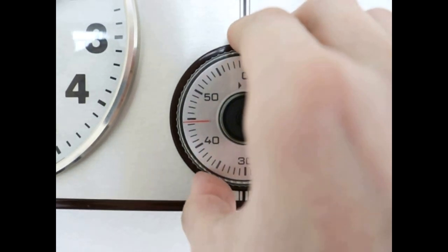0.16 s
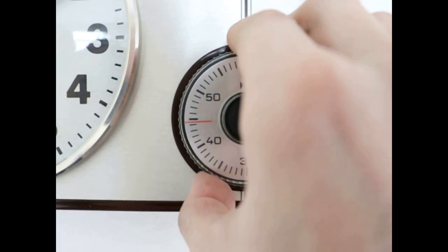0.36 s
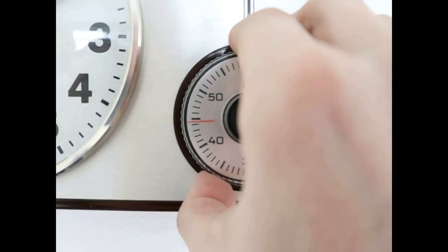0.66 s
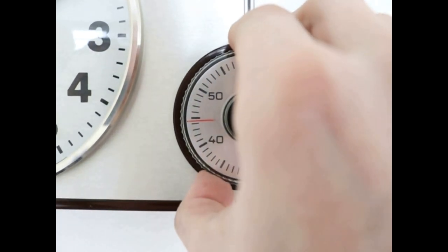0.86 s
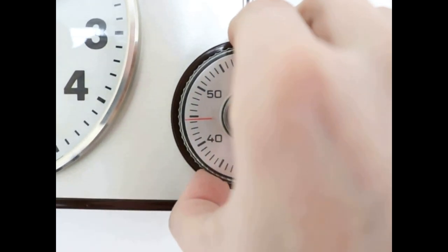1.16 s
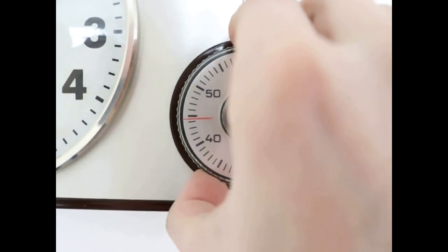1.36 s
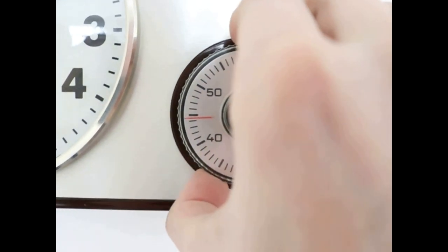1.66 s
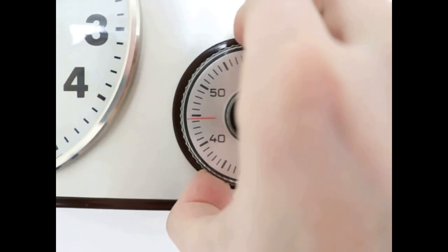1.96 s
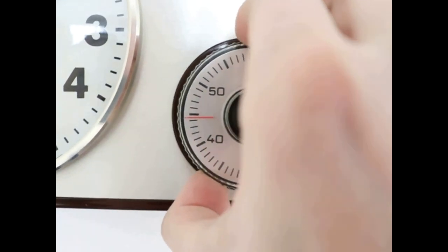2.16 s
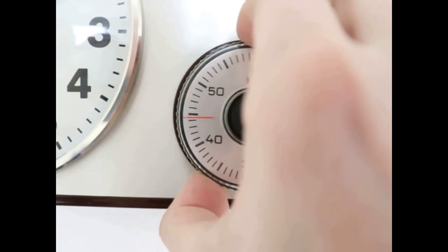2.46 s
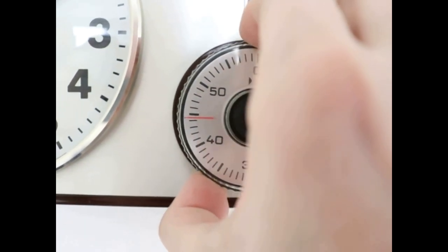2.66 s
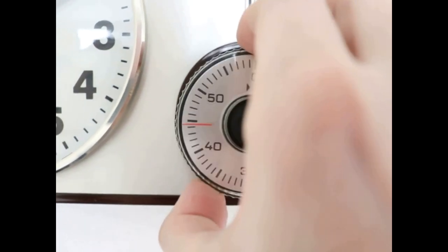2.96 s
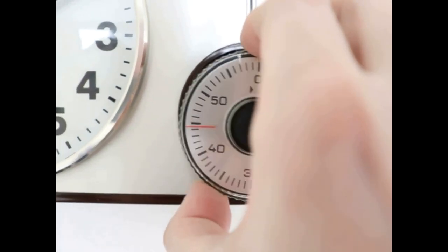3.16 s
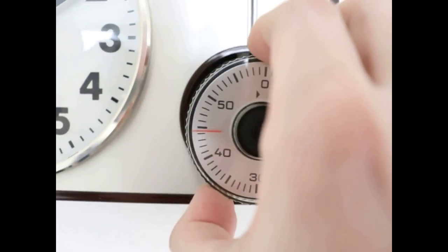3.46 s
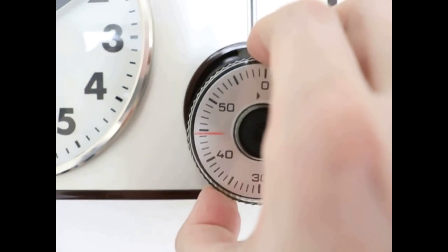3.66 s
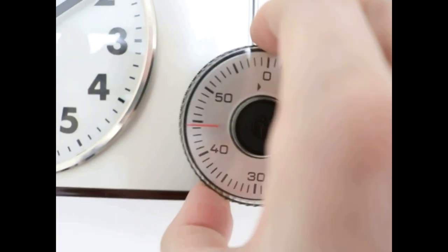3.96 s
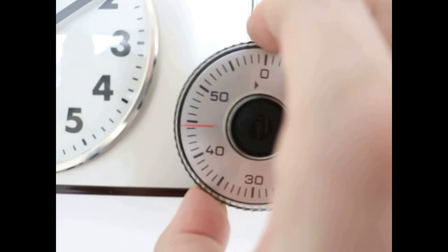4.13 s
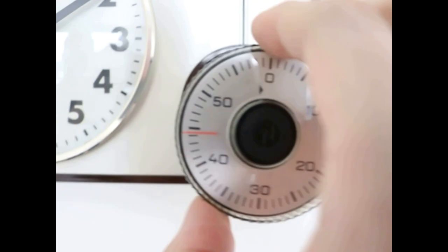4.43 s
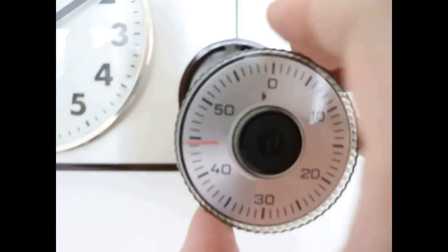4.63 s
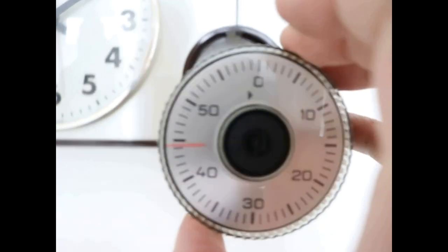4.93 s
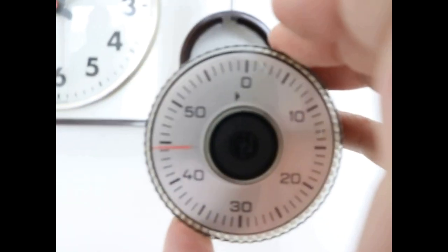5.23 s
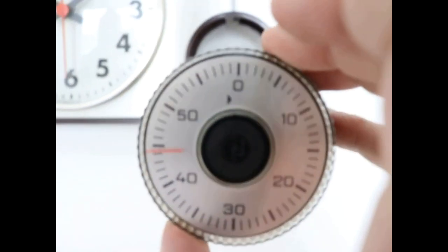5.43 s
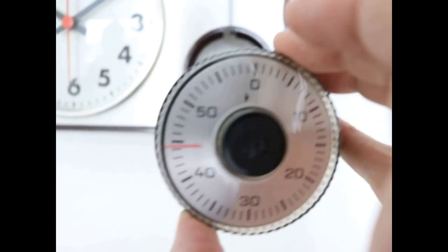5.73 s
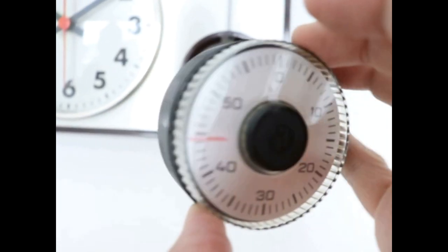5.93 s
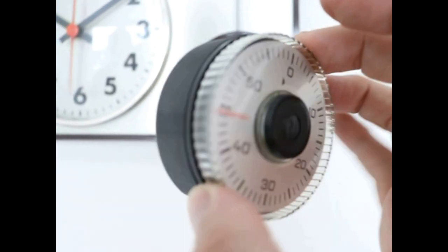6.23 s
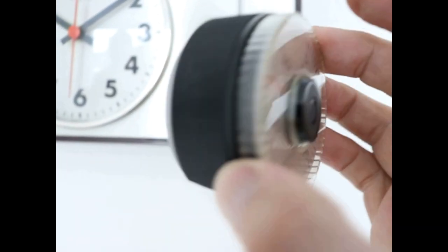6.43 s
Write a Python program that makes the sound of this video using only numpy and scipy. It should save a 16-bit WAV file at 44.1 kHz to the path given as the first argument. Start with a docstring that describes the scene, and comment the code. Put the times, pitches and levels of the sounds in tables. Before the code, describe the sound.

Close to the microphone in a small room with steady low noise, a wind-up timer ticks throughout: a crisp tick every 0.52 s, starting near 0.17, each followed about 0.28 s later by a weaker tock. Each beat is a cluster of tiny steel clicks around 4-5 kHz with a small boxy case response. At first a palm dulls them. Fingers rub from 0.15; hollow plastic knocks come at 0.5-0.8, with a harder cracking group at 0.94-1.07. A short creak at 1.26 leads to soft dull thuds from 1.4 to 2.07, then a sharp knock at 2.2. A loudest double plastic clack lands at 2.89-2.93. Afterwards ticks are brighter, with a soft bell shimmer strongest around 4.4. A light tap and creak come at 3.65, a skin slip at 4.8, creaks at 5.26 and 6.25, over faint sliding and occasional faint low hum until 6.6.

```python
"""Close to the microphone in a small room, over steady room noise, a wind-up kitchen timer ticks under a palm:
each beat of the escapement is a cluster of tiny metal clicks that ring the case and, softly, the alarm bell.
A hand rubs and slides on the case, knocks it on its wall holder, makes it creak and slip in dull thuds, and
works it free with a plastic clack near 2.9 s. With the palm off the dial the ticks come brighter and the bell
rings more freely, until the dial is turned aside; a low hum swells now and then."""
import sys
import numpy as np
from scipy import signal
from scipy.fft import rfft, irfft
from scipy.io import wavfile
from scipy.ndimage import uniform_filter1d

SR = 44100
rng = np.random.default_rng(int(sys.argv[2]) if len(sys.argv) > 2 else 0)


def dump(signal):
    """Clip the signal to [-1, 1] and save it as 16-bit WAV at the path in sys.argv[1]."""
    limited = np.clip(np.atleast_2d(signal).T, -1, 1)
    pcm = np.round(limited * 32767).astype(np.int16)
    wavfile.write(sys.argv[1], SR, pcm)


N = 290619

# spectrum of the hollow case, knocked or rubbed: (frequency [Hz], relative level [dB])
HOLLOW_CASE = [(60, -70), (150, -34), (230, -17.5), (340, -10), (450, -10), (560, -2.5), (760, -1.5),
               (950, -8.5), (1200, -11.5), (1700, -22), (4000, -39), (12000, -68)]
# spectrum of the hard plastic edge, cracking or creaking: (frequency [Hz], relative level [dB])
HARD_EDGE = [(130, -55), (450, -1), (1100, 8.5), (1800, 5.5), (2700, 0), (3200, 3.5), (4700, -6.5),
             (7000, -9.5), (10000, -20.5), (16000, -38)]


def amp(db):
    """Amplitude factor of a level in dB."""
    return 10 ** (np.asarray(db) / 20)


def unit(x):
    """Scale each channel to unit energy."""
    return x / np.sqrt(np.sum(x ** 2, -1, keepdims=True) + 1e-20)


def at_hz(points, hz):
    """Read a curve on a logarithmic frequency axis."""
    f, value = np.transpose(points)
    return np.interp(np.log(hz + 1), np.log(f + 1), value)


def at_time(points, s):
    """Read a curve over time in seconds."""
    return np.interp(s, *np.transpose(points))


def add(mix, s, sound):
    """Lay a sound into the mix from time s, cut off at the end."""
    part = mix[:, max(round(s * SR), 0):][:, :sound.shape[-1]]
    part += sound[..., :part.shape[1]]


def colour(x, points, size=4096):
    """Causal minimum-phase filter with the given spectrum."""
    hz = abs(np.fft.fftfreq(size, 1 / SR))
    log_gain = np.log(amp(at_hz(points, hz)))
    response = np.exp(np.conj(signal.hilbert(log_gain)))
    taps = np.fft.ifft(response).real[:size // 2]
    return signal.fftconvolve(x, taps[None], axes=1)[:, :x.shape[1]]


def pair(size, alike):
    """Two channels of noise that share the part alike (0-1) of their power."""
    both, left, right = rng.standard_normal((3, size))
    alike = np.clip(alike, 0, 1)
    return np.sqrt(alike) * both + np.sqrt(1 - alike) * np.array([left, right])


def chatter(decay_s, alike, size=2048):
    """A contact rattling out within milliseconds, its spectrum evened so that like blows have like strength."""
    fade = np.exp(-np.arange(size) / SR / decay_s)
    z = rfft(pair(size, alike) * fade)
    z /= np.sqrt(uniform_filter1d(abs(z) ** 2, size=25, axis=1) + 1e-12)
    # evening the spectrum smears the decay, so part of the fade is laid on again
    return unit(irfft(z) * fade ** .25)


def ring(modes, skew, size=14000):
    """Dying modes that build up within 1.2 ms; every blow shares its energy among them a little differently."""
    t = np.arange(size) / SR
    shares_db = 3 * rng.standard_normal(len(modes))
    rise = np.sin(np.pi / 2 * np.minimum(t / .0012, 1)) ** 2
    total = np.zeros((2, size))
    for (hz, db, t60), share_db in zip(modes, shares_db):
        phase = skew * rng.standard_normal((2, 1))  # the two sides differ
        total += amp(db + share_db - 60 * t / t60) * np.cos(2 * np.pi * hz * t + phase)
    return unit(rise * total)


def room(x, gap_s, alike, size=26000):
    """Dense reflections after a short gap, each band dying at its own speed."""
    # reverberation of the small room: (frequency [Hz], t60 [s])
    reverberation = [(150, 0.53), (700, 0.39), (2000, 0.41), (4500, 0.35), (9000, 0.48), (15000, 0.33)]
    after_gap = np.arange(size) > gap_s * SR
    taps = pair(size, alike) * after_gap * (rng.random(size) < .2)
    hz, t, z = signal.stft(taps, SR, nperseg=256)
    decay = amp(-60 * t / at_hz(reverberation, hz)[:, None])
    tail = signal.istft(z * decay, SR, nperseg=256)[1]
    return signal.fftconvolve(x.mean(0)[None], unit(tail), axes=1)[:, :N]


def strokes(rows, attack_s, release_s):
    """Level over time of strokes that build up ahead of their start, hold and let go."""
    t = np.arange(N) / SR
    levels = []
    for start, length, db in rows:
        away = np.maximum((start - t) / attack_s, (t - start - length) / release_s)
        levels.append(amp(db) * np.exp(-away.clip(0, 20)))
    return np.max(levels, axis=0)


def grainy(level, spectrum, grains_per_s, grain_db, alike):
    """Many tiny grains of uneven size, scattered at random under a changing level, with their reflections."""
    sizes = amp(grain_db * np.minimum(rng.exponential(1, N), 4))
    grains = (rng.random(N) < grains_per_s / SR) * sizes * pair(N, alike)
    # each grain chatters on for a few milliseconds
    grains = signal.oaconvolve(grains, chatter(decay_s=.004, alike=1)[:1], axes=1)[:, :N]
    sound = unit(colour(grains, spectrum)) * np.sqrt(N) * level
    return sound + amp(-9) * room(sound, gap_s=0.0015, alike=0.95)


def contacts():
    """Steady swings, each with one tick and one tock, then the jolts: (s, level dB, body ring dB)."""
    # one row per swing, each tooth dropping with its own force: (tick level [dB], tock level [dB])
    forces = [(-26, -35.5), (-30.5, -37), (-29, -40), (-33.5, -41), (-29.5, -39.5), (-31.5, -38.5),
              (-28, -38), (-32, -36), (-29.5, -33), (-28, -31.5), (-27, -33.5), (-29, -34), (-27.5, -37)]
    # unlocking, push, drop and rebounds within a tick:
    # (time from the drop [s], level against the force [dB], body ring against the click [dB])
    tick_contacts = [(-.048, -14, 4), (-.008, -23, 1), (0, 1, -7.5), (.021, -21, 7.5), (.034, -21, 4),
                     (.068, -24.5, 6)]
    # contacts within a tock:
    # (time from the drop [s], level against the force [dB], body ring against the click [dB])
    tock_contacts = [(-.059, -15.5, 3.5), (-.046, -18.5, 3.5), (-.019, -14.5, 1), (-.01, -9, -4),
                     (0, 0, -2), (.019, -7.5, -6.5)]
    # the hand jarring the works: (time [s], level [dB], body ring against the click [dB])
    jolts = [(0.942, -34.5, -14), (0.975, -38, -15), (1.007, -28.5, -12), (2.207, -27, 0), (4.789, -34, -5)]
    # the balance is a little out of beat: the tock comes later than halfway
    first_tick_s, swing_s, tock_after_s = 0.1652, 0.5163, 0.2812
    # the grip damps the case until the hand eases off
    grip_damping_db, ease_from_s, ease_to_s = -3.5, 2.5, 3.8
    rows = []
    for k, (tick_db, tock_db) in enumerate(forces):
        tick_s = first_tick_s + k * swing_s
        damping_db = grip_damping_db * np.interp(tick_s, [ease_from_s, ease_to_s], [1, 0])
        beats = (tick_s, tick_contacts, tick_db), (tick_s + tock_after_s, tock_contacts, tock_db)
        for drop_s, beat, force_db in beats:
            rows += [(drop_s + s, force_db + db, body_db + damping_db) for s, db, body_db in beat]
    return [row for row in rows if row[0] < N / SR] + jolts


def sides(s):
    """Left and right gain of the timer where it is held at that moment."""
    # where the timer is held: (time [s], left against right [dB])
    position = [(0, 0), (2, -1.5), (4.3, 2), (5.4, -1), (6.3, -2.5)]
    return amp(at_time(position, s) * np.array([[1], [-1]]) / 2)


def background():
    """Steady room noise, its two channels alike to a different degree in each band."""
    # spectrum of the room noise: (frequency [Hz], relative level [dB])
    floor_spectrum = [(20, -24), (44, 6), (70, -3.5), (120, 1.5), (250, -1.5), (450, -2.5), (700, -6),
                      (1100, -6), (2500, -10.5), (4200, -10.5), (7000, -16), (10000, -19), (16000, -25.5)]
    # likeness of left and right: (frequency [Hz], correlation)
    likeness = [(40, 0.49), (200, 0.6), (800, 0.21), (2500, 0), (6000, 0.032), (15000, 0.025)]
    floor_db = -54.5
    hz = np.fft.rfftfreq(N, 1 / SR)
    a, b = rfft(rng.standard_normal((2, N)))
    alike = np.clip(at_hz(likeness, hz), -1, 1)
    right = alike * a + np.sqrt(1 - alike ** 2) * b
    noise = irfft(np.array([a, right]) * amp(at_hz(floor_spectrum, hz)), N)
    return amp(floor_db) * np.sqrt(N) * unit(noise)


def escapement():
    """Steel clicks ring the works and the case; the palm muffles the top while it covers the dial."""
    # how open the dial lies to the microphone, under the palm at first, turned aside at the end:
    # (time [s], share [0-1])
    openness = [(0, 0), (2.75, 0.66), (3.25, 1), (4.0, 0.9), (4.3, 0.77), (6.59, 0.5)]
    # spectrum of the clicks: (frequency [Hz], relative level [dB])
    click_spectrum = [(120, -53), (1500, -27), (2800, -12), (4100, 3.5), (4700, 0), (5900, -4),
                      (6700, -4.5), (7300, -12), (8100, -6.5), (9200, -11.5), (10200, -16.5),
                      (12700, -17.5), (15500, -28)]
    # what the covering palm does to a click: (frequency [Hz], relative gain [dB])
    palm_filter = [(500, 28.5), (2200, 4.5), (3300, 3.5), (4000, -1.5), (5000, 2), (6500, -5.5), (8500, -2),
                   (16000, -9.5)]
    # modes of the steel works: (frequency [Hz], relative level [dB], t60 [s])
    steel_modes = [(3360, 1, 0.042), (3870, -7, 0.078), (4210, 14, 0.021), (4070, 6.5, 0.019),
                   (5200, -9, 0.078), (6640, -20, 0.12), (8660, -22, .04)]
    # spectrum of the case answering: (frequency [Hz], relative level [dB])
    body_spectrum = [(100, -48), (380, -22), (650, -7), (1000, 4), (1400, 2), (1800, -7), (2200, -1),
                     (2700, -5), (4000, -8), (9000, -58.5)]
    clicks, body = np.zeros((2, 2, N))
    works = chatter(decay_s=0.0067, alike=0.11)  # the part of the rattle that all contacts share
    for s, db, body_db in contacts():
        bare = np.clip(at_time(openness, s), 0, 1)
        rattle = .6 * works + .8 * chatter(decay_s=.0034, alike=.7)
        # light contacts slide in before they seat, hard ones start almost at once
        rise_s = .0003 * amp(-.9 * (db + 27))
        rattle = rattle * -np.expm1(-np.arange(1, 2049) / SR / rise_s)
        # every tooth meets the pallet a little differently
        tooth = [(hz, level + 2 * rng.standard_normal()) for hz, level in click_spectrum]
        click = unit(colour(rattle, tooth))
        click = unit(bare * click + (1 - bare) * colour(click, palm_filter))
        steel = ring(steel_modes, skew=0.55, size=5000)
        case = unit(colour(chatter(decay_s=0.016, alike=0.71), body_spectrum))
        add(clicks, s, amp(db + 25.0) * sides(s) * click)
        add(clicks, s, amp(0.74 * db + 8.5) * sides(s) * steel)
        add(body, s, amp(db + body_db + 21.0) * sides(s) * case)
    t = np.arange(N) / SR
    dial = np.clip(at_time(openness, t), 0, 1)
    # the more open the dial, the later its clicks reach the left side, by up to 2 samples
    lag = np.round(2 * dial ** 2).astype(int)
    direct = np.array([clicks[0, np.arange(N) - lag], clicks[1]])
    # the palm holds back part of what would reach the room
    escaping = clicks * amp(-2 * (0.5 - dial))
    # three patterns of reflections take turns every 0.2 s, so that no single one colours all the clicks
    turns = [escaping * (t // .2 % 3 == k) for k in range(3)]
    echoes = sum(room(part, gap_s=0.0017, alike=0.12) for part in turns)
    body_echoes = room(body, gap_s=0.0013, alike=0.17)
    return direct + body * amp([[-.8], [.8]]) + amp(-10.0) * echoes + amp(-6.5) * body_echoes


def bell():
    """The alarm bell is never struck, but each contact that shakes the case jolts it into a short soft ring."""
    # modes of the alarm bell: (frequency [Hz], relative level [dB], t60 [s])
    bell_modes = [(1030, -14.5, 0.18), (1320, -10.5, 0.081), (1513, -8.5, 0.11), (2224, 3.5, 0.082),
                  (2490, -13, 0.11), (3100, -8, 0.098)]
    # how freely the bell rings between the fingers: (time [s], relative level [dB])
    freedom = [(0, -13), (2.9, -5), (3.8, -2), (4.35, 4), (4.8, -15), (5.1, -9.5), (5.35, 1.5), (6.4, -4)]
    sound = np.zeros((2, N))
    for s, db, body_db in contacts():
        gain = amp(0.82 * (db + body_db) + at_time(freedom, s) + 17.0)
        add(sound, s, gain * sides(s) * ring(bell_modes, skew=0.23, size=8000))
    return sound * amp([[-4], [3]]) + amp(-16.5) * room(sound, gap_s=0.01, alike=0.93)


def click_rustle():
    """A faint grainy rustle swells around each click and fades within milliseconds."""
    # spectrum of the rustle around the clicks: (frequency [Hz], relative level [dB])
    rustle_spectrum = [(120, -61), (450, -17), (900, 4.5), (1400, -3.5), (2700, -5), (4200, 2), (6500, -17),
                       (7300, -1.5), (8500, -11), (15500, -27)]
    t = np.arange(0, N / SR, 1 / 500)
    power = np.zeros(len(t))
    for s, db, body_db in contacts():
        power += amp(db + .5 * body_db) ** 1.38 * np.exp(-abs(t - s) / 0.0074)
    level = amp(-27.5) * np.interp(np.arange(N) / SR, t, np.sqrt(power))
    return grainy(level, rustle_spectrum, grains_per_s=1400, grain_db=1.0, alike=0.55)


def rubbing():
    """Fingers rub on the case in sparse slips that sound its hollow body."""
    # (start [s], length [s], level [dB])
    rubs = [(.15, 0.33, -53.5), (.52, .22, -46), (.92, 0.088, -43), (1.24, 0.079, -51.5),
            (2.17, 0.12, -46.5), (2.64, 0.056, -57.5), (2.88, 0.14, -48), (3.3, 0.3, -57.5)]
    level = strokes(rubs, attack_s=0.032, release_s=0.062)
    return grainy(level, HOLLOW_CASE, grains_per_s=260, grain_db=3.0, alike=0.9)


def sliding():
    """Skin slides over the ribbed rim in a dense, bright hiss of slips."""
    # (start [s], length [s], level [dB])
    slides = [(.19, 0.13, -55.5), (.96, 0.35, -56), (2.2, 0.039, -43), (3.01, 0.021, -50),
              (4.8, 0.057, -44.5), (5.1, 1.4, -65)]
    # spectrum of skin on the rim: (frequency [Hz], relative level [dB])
    skin_spectrum = [(120, -36), (600, -12), (1500, -1.5), (3000, 3), (4500, 3), (6500, -3), (9000, -9),
                     (15500, -32)]
    level = strokes(slides, attack_s=0.023, release_s=0.068)
    return grainy(level, skin_spectrum, grains_per_s=3300, grain_db=0.5, alike=0.12)


def bounces():
    """Every knock with its bounces, each later, weaker and duller: (s, level dB, hard edge dB)."""
    # the case knocking against its holder:
    # (time [s], level [dB], hard edge against the knock [dB], bounces [count])
    blows = [(.507, -34.5, -18, 1), (.548, -40, -6, 0), (.565, -36, -8.5, 0), (.6, -36, -30, 0),
             (.694, -36, -10, 0), (.796, -33, -19, 0), (.943, -30.5, -5.5, 0), (.979, -30.5, -5, 0),
             (1.008, -27, 6, 0), (1.066, -34.5, -23, 0), (2.2, -31, 2, 0), (2.208, -28, -0.5, 1),
             (2.231, -27.5, -22, 0), (2.633, -45, -9, 0), (2.888, -27, -6.5, 0), (2.895, -26.5, -14, 2),
             (2.931, -18.5, 0, 1), (3.657, -38, -18, 1)]
    later_s, weaker_db, duller_db = .0068, -2, -1  # change per bounce
    return [(s + k * later_s, db + k * weaker_db, edge_db + k * duller_db)
            for s, db, edge_db, count in blows for k in range(round(count) + 1)]


def knocks():
    """Hollow plastic blows leave the shell ringing; a bright crack of its own strength goes with each."""
    # modes of the plastic shell: (frequency [Hz], relative level [dB], t60 [s])
    shell_modes = [(190, -13.5, 0.42), (370, -4, 0.2), (573, -39, .14), (698, -0.5, 0.25),
                   (752.3, 6.5, 0.1), (763, -11, 0.21), (993, -2.5, 0.3), (1130, 8, 0.097),
                   (1220, -18, 0.22), (1520, -23, 0.33), (1920, -33, .2), (2150, -16.5, 0.34),
                   (3120, -15, 0.058), (4930, -28, 0.13)]
    dull, hard, shell = np.zeros((3, 2, N))
    for s, db, edge_db in bounces():
        blow = unit(colour(chatter(decay_s=0.0078, alike=0.92), HOLLOW_CASE))
        crack = unit(colour(chatter(decay_s=0.0067, alike=0.31), HARD_EDGE))
        add(dull, s, amp(db + 23) * blow)
        add(hard, s, amp(db + edge_db + 25) * crack)
        add(shell, s, amp(db + 21.0) * ring(shell_modes, skew=.3))
    dull_echoes = room(dull, gap_s=0.014, alike=0.82)
    hard_echoes = room(hard, gap_s=0.0094, alike=0.095)
    sound = dull + hard + shell + amp(-11) * dull_echoes + amp(-9) * hard_echoes
    # so small a shell radiates no bass
    return signal.sosfilt(signal.butter(4, 185, "high", fs=SR, output="sos"), sound)


def rumbling():
    """The weight of the hand shifts on the case in dense, low slips."""
    # (start [s], length [s], level [dB])
    shifts = [(.59, 0.09, -60), (1.03, 0.047, -48.5), (1.24, 0.16, -57), (2.2, 0.035, -44.5),
              (2.4, 0.57, -66), (6.4, .05, -61.5)]
    # spectrum of the hand's rumble: (frequency [Hz], relative level [dB])
    heavy_spectrum = [(22, -30), (45, -8), (70, -7), (100, -7), (180, 4), (300, -15), (900, -50)]
    level = strokes(shifts, attack_s=0.024, release_s=0.04)
    return grainy(level, heavy_spectrum, grains_per_s=3500, grain_db=1.5, alike=0.87)


def creaking():
    """The rim creaks under the fingers in short bursts of slips on the hard edge."""
    # (start [s], length [s], level [dB])
    creaks = [(1.256, 0.072, -50.5), (2.633, 0.022, -57), (3.655, .02, -51), (5.26, 0.091, -47),
              (6.22, .008, -52.5), (6.255, 0.029, -50)]
    level = strokes(creaks, attack_s=0.0042, release_s=0.0056)
    return grainy(level, HARD_EDGE, grains_per_s=1500, grain_db=-1.5, alike=0.65)


def thuds():
    """Each slip is a small give and then one soft push on the case, with reflections from the wall and hand."""
    # the gripped case slipping by small steps: (time [s], relative level [dB])
    slip_steps = [(1.383, -35.5), (1.521, -30.5), (1.652, -33), (1.797, -27.5), (1.821, -36), (1.944, -40),
                  (2.069, -26)]
    # spectrum of a push: (frequency [Hz], relative level [dB])
    thud_spectrum = [(50, -23), (120, -14.5), (190, -8.5), (280, -14.5), (380, -5), (480, -8.5), (600, 5.5),
                     (780, -5.5), (1050, -16), (1500, -28), (3500, -33), (12000, -64)]
    pushes = np.zeros((2, N))
    push = signal.unit_impulse(2048, 130) - .25 * signal.unit_impulse(2048)
    for s, db in slip_steps:
        rough_push = push + 0.82 * chatter(decay_s=0.021, alike=0.77)
        add(pushes, s - .002, amp(db + 25.5) * unit(colour(rough_push, thud_spectrum)))
    return pushes + amp(-13) * room(pushes, gap_s=.01, alike=.8)


def hum():
    """A faint low tone near 121 Hz swells now and then, its pitch wavering by a few hertz."""
    # swells of the hum: (start [s], length [s], level [dB])
    swells = [(2.45, 0.61, -67), (4.25, .55, -63), (6.3, 0.18, -64)]
    hum_hz = 121
    # the smoothing leaves a spread of about 2.4 Hz
    waver = uniform_filter1d(rng.standard_normal(N), size=4000) * 150
    tone = np.sqrt(2) * np.sin(2 * np.pi * np.cumsum(hum_hz + waver) / SR)
    return strokes(swells, attack_s=0.18, release_s=0.093) * tone


def scene():
    """The ticking works, the hand on the case, and the room."""
    timer = escapement() + bell() + click_rustle()
    hand = rubbing() + sliding() + knocks() + rumbling() + creaking() + thuds()
    return background() + timer + hand + hum()


def record(dry):
    """The recorder's band limit: a steep low-pass."""
    cutoff_hz = 15950
    taps = signal.firwin(511, cutoff_hz, window=("kaiser", 9), fs=SR)
    return signal.oaconvolve(dry, taps[None], "same")


dry = scene()
out = record(dry)
dump(out)
```